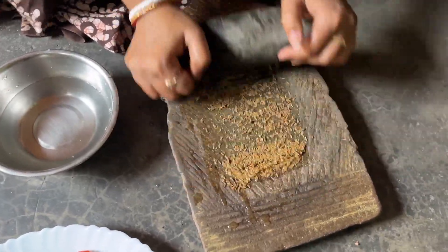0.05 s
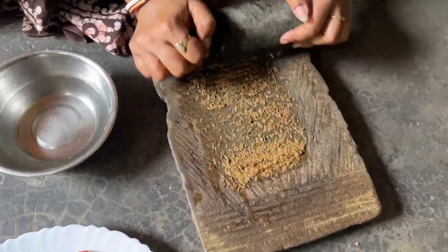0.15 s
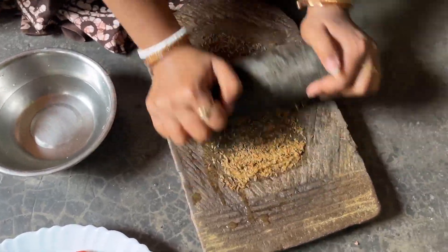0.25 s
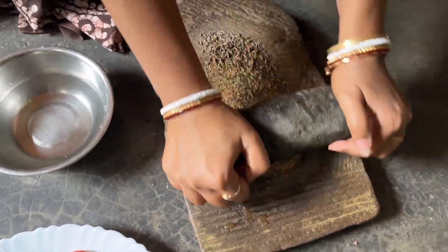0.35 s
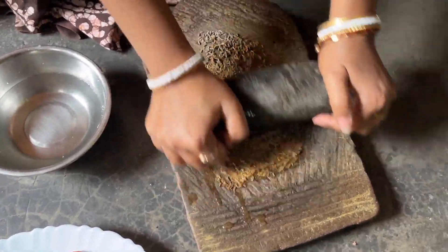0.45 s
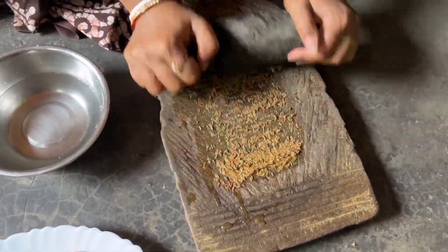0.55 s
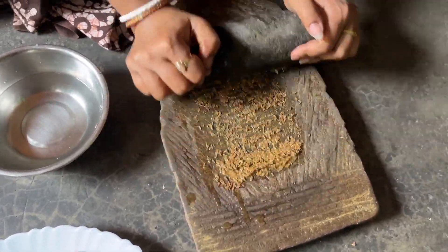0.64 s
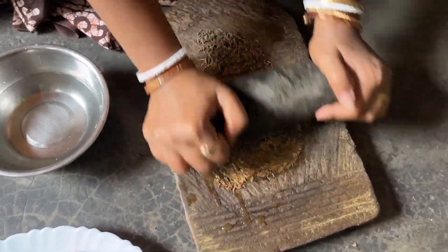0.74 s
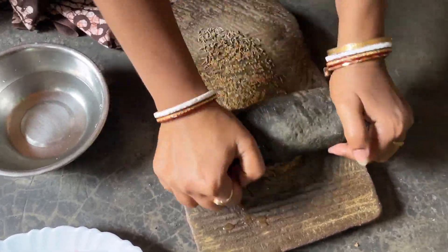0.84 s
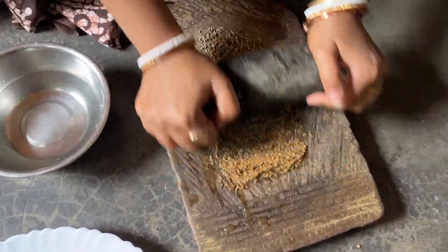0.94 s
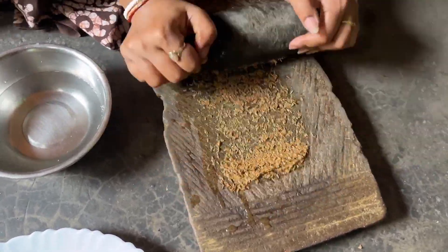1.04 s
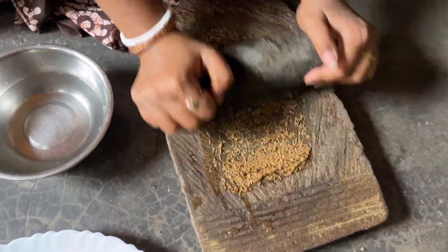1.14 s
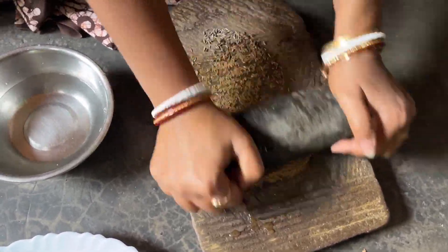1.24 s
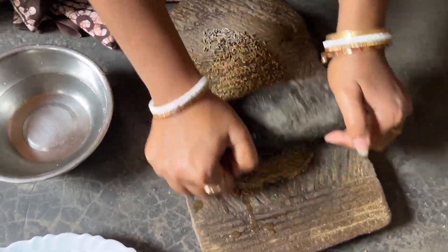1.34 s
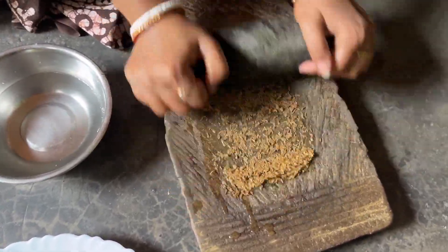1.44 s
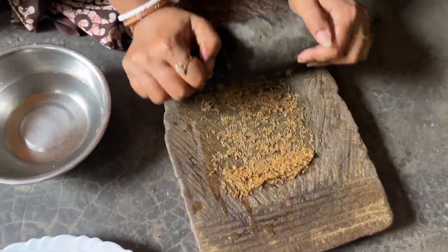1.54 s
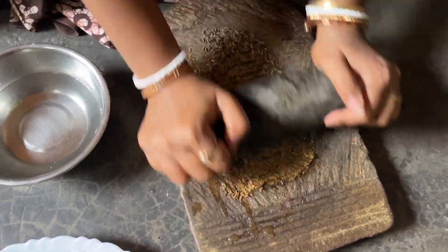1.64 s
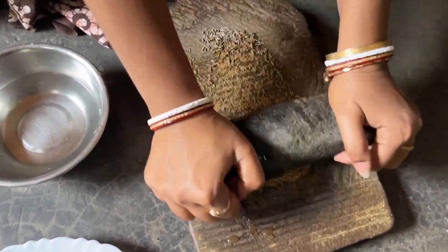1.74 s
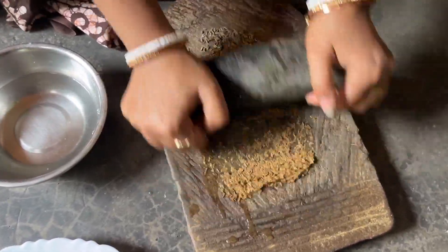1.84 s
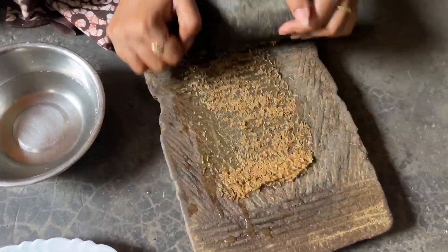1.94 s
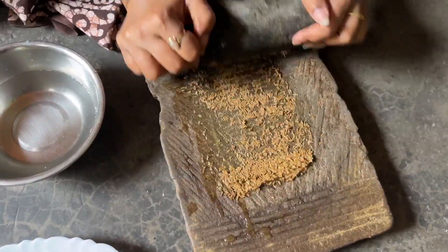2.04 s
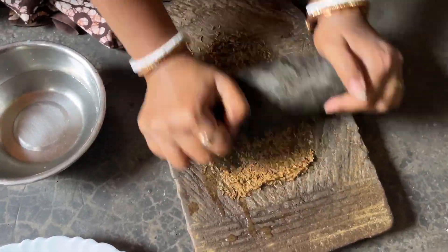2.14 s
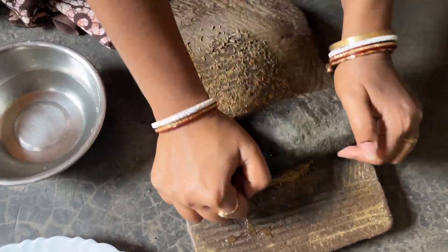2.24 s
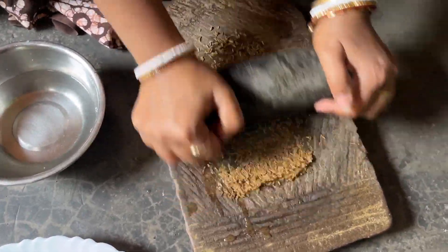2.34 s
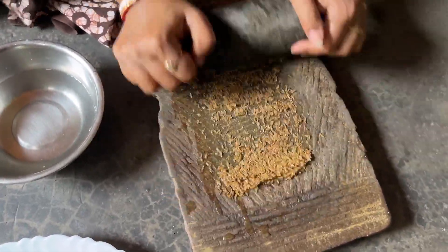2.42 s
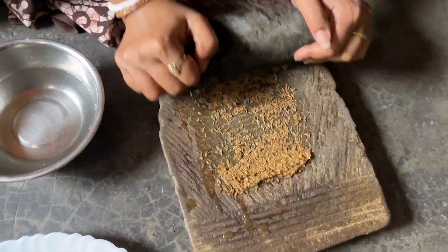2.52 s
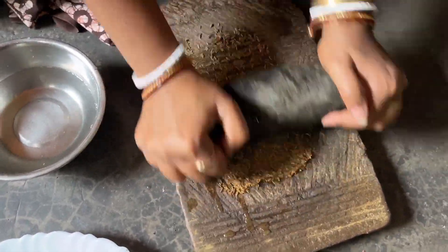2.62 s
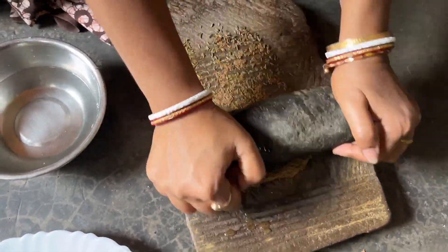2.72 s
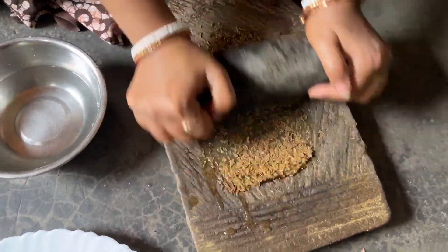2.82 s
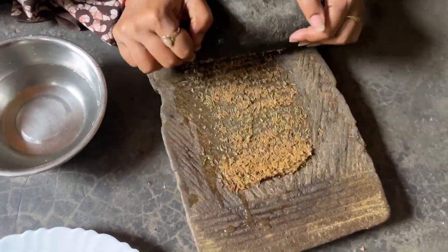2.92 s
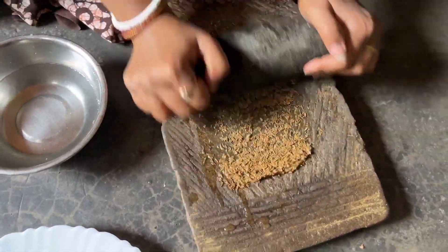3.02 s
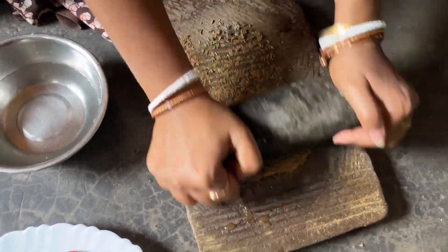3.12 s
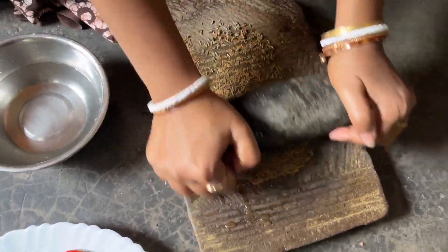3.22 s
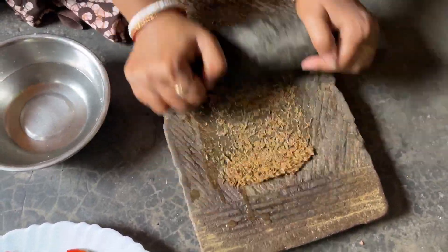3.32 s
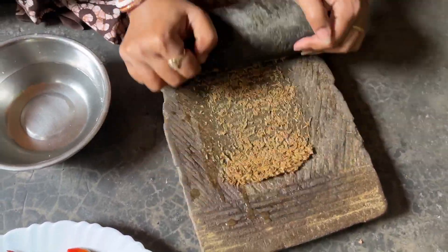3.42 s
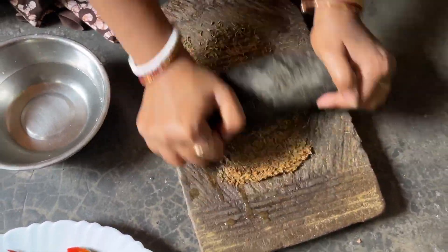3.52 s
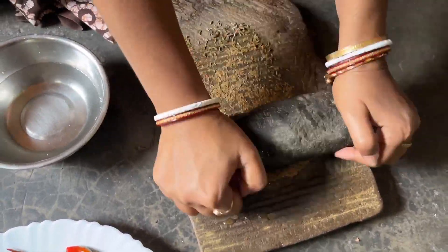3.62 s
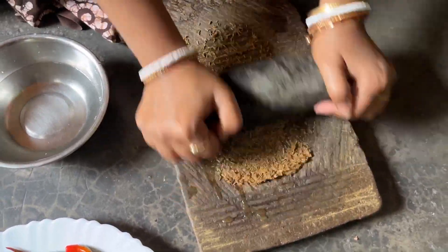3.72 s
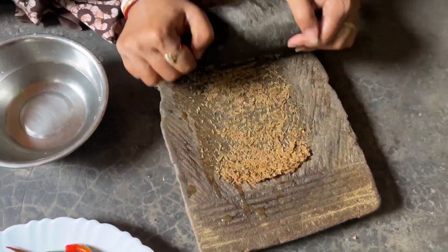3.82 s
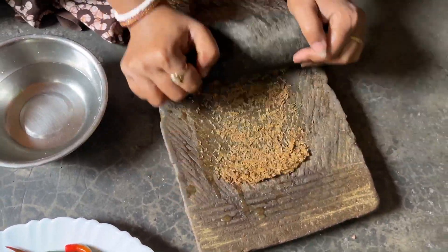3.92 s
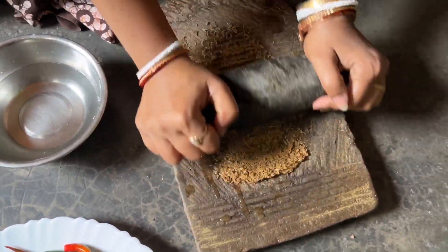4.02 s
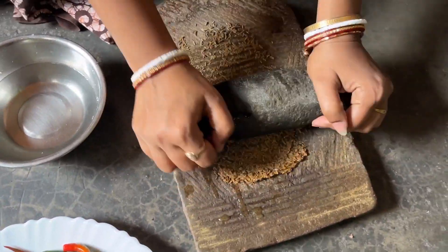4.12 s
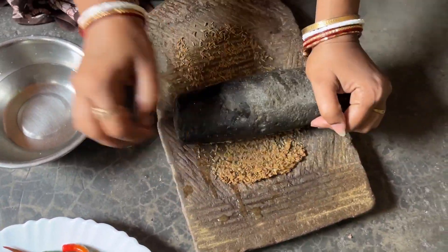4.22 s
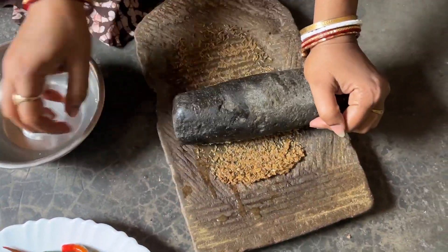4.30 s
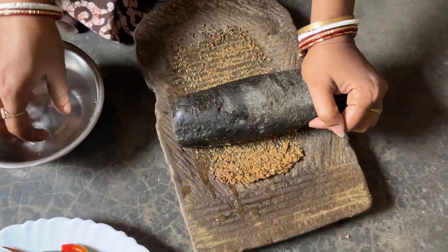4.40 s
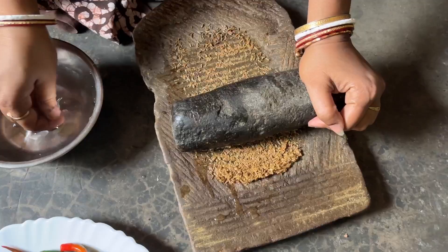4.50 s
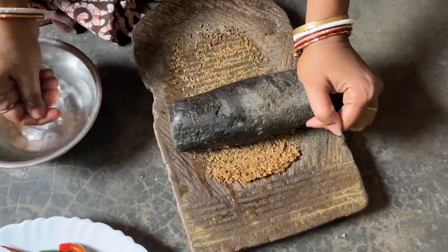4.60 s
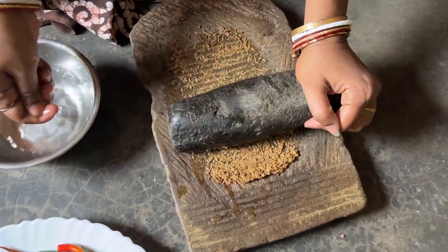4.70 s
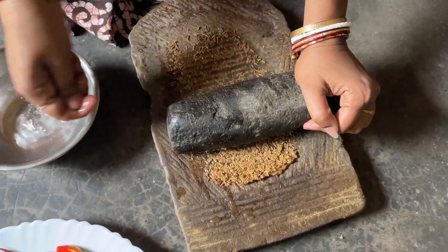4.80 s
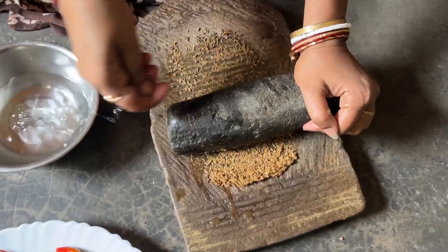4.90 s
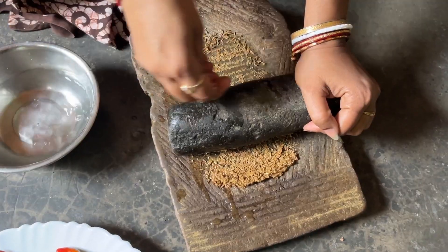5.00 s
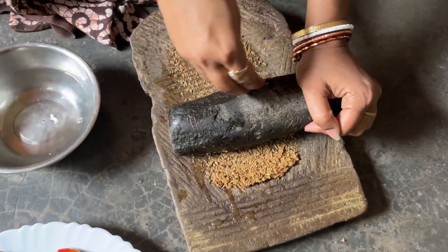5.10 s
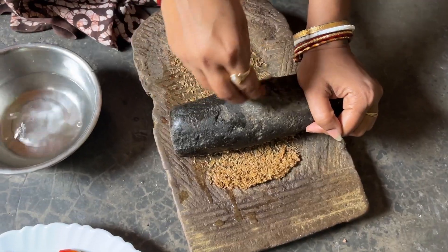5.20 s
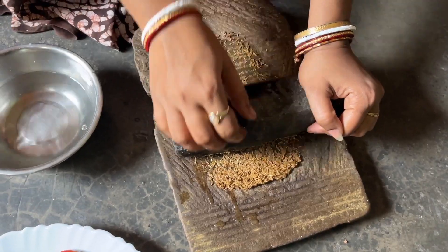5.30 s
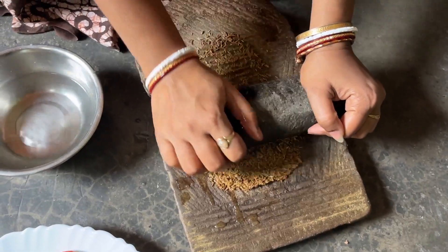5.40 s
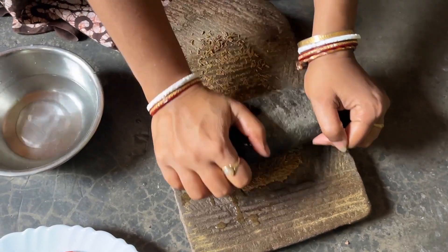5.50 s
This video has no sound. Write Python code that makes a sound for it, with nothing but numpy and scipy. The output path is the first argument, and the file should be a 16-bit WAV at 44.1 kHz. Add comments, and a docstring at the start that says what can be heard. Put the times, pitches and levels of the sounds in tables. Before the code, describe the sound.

A close stereo microphone in a small, fairly dry kitchen hears a stone roller worked over spices on a grooved stone slab. From 0 to about 4.1 s it moves to and fro, each stroke lasting roughly a quarter second, with a deep soft rumble, coarse grinding and crackling grain crunch that swell mid-stroke and dip at the turns. Short, dull, hollow stone knocks around 900 Hz come in irregular clusters, dense at the very start, around 0.5-0.6, 2.3-2.5 and 3.7-3.9 s; brief rough singing rubs appear near 1.5, 2, 2.9 and 3.4 s. Thin, very bright bangle clinks, only milliseconds long, gather mostly at stroke ends, such as 0.3, 0.8, 1.25, 1.7, 2.2, 2.7, 3.15, 3.6 and 4.05 s. A pan sizzles softly and evenly behind everything over a faint low hum. After a last tiny clink near 4.14 s only the sizzle remains, until a barely audible roll and tap from about 5.45 s.

```python
"""A stone roller is pushed to and fro over wet spices on a grooved stone slab in a home kitchen.
It rumbles (shaped noise), crunches grains (random clicks ringing the stone) and knocks over the grooves
(short bursts of the stone's tones); now and then it sings roughly. Bangles clink as bright ringing tones.
A pan sizzles further off: thousands of clicks a second, merged to a hiss. Two close microphone ports hear it."""
import sys
import numpy as np
from scipy import signal
from scipy.fft import rfft, irfft
from scipy.io import wavfile

SR = 44100
rng = np.random.default_rng(int(sys.argv[2]) if len(sys.argv) > 2 else 0)


def master(y):
    """Save y as 16-bit WAV."""
    cut = np.clip(np.atleast_2d(y).T, -1, 1)
    pcm = np.round(cut * 32767)  # scale
    wavfile.write(sys.argv[1], SR, pcm.astype(np.int16))


N = 244755  # length in samples

# Passes of the roller, push and pull in turn, each ending where the next starts; levels when fastest:
# start t/s, slab rumble level/dB, roller grind level/dB, grain crunch level/dB
PASSES = [(-.1, -42, -34, -34), (0.142, -35.5, -48, -37.5), (.37, -34, -41.5, -33.5),
          (0.653, -35, -43, -33), (.83, -36.5, -43, -35), (1.08, -36.5, -41, -37),
          (1.29, -33.5, -39.5, -33.5), (1.56, -33.5, -41, -34), (1.74, -34.5, -39.5, -31),
          (1.98, -36, -52, -35.5), (2.24, -33.5, -38, -37), (2.53, -36, -39, -39), (2.72, -33, -43, -36),
          (2.98, -36, -40.5, -34.5), (3.19, -33.5, -42, -36), (3.44, -36, -41, -34.5),
          (3.64, -34.5, -42.5, -37.5), (3.91, -35.5, -41, -38), (4.035, -90, -90, -90),
          (5.44, -50, -63, -54)]
# Ringing tones (modes) of the stone; their times are scaled by each kind of contact:
# f/Hz, rise t/s, decay t/s, left over right level/dB, level in the crunch/dB
STONE = [(207, 0.004, 0.0019, -1, -6), (478, 0.0028, 0.0045, 4, 0), (920, .0036, .0028, 6.5, 0),
         (1410, 0.0062, 0.0046, -1.5, 0), (1760, 0.003, 0.0022, 6, -3), (2323, 0.0028, 0.0016, 1, -11),
         (3340, 0.003, 0.003, 0, -40)]


def from_db(db):
    """Turns a level in dB into a gain."""
    return 10 ** (np.asarray(db) / 20)


def rms_one(x):
    """Scales a sound to an rms strength of 1."""
    return x / np.sqrt(np.mean(x ** 2) + 1e-20)


def in_time(rows):
    """Reads the columns of a time table at every sample."""
    s, *columns = np.transpose(rows)
    return [np.interp(np.arange(N) / SR, s, column) for column in columns]


def at_hz(points, hz):
    """Reads a spectrum table along a logarithmic pitch axis."""
    table_hz, values = np.array(points)[:, 0], np.array(points)[:, 1]
    return np.interp(np.log(hz + 1), np.log(table_hz), values)


def drift(rate_hz):
    """Smoothed noise that wanders slowly about zero with an rms of 1."""
    step = 40  # one value per 40 samples, joined by straight lines
    r = np.exp(-2 * np.pi * rate_hz * step / SR)
    noise = rng.standard_normal(N // step + 2002)
    slow = signal.lfilter([1], [1, -2 * r, r * r], noise)[2000:]
    return np.interp(np.arange(N) / step, np.arange(len(slow)), rms_one(slow))


def sparse(per_s, spread_db):
    """Clicks at random moments, of uneven size and either sign."""
    sizes = from_db(spread_db * np.minimum(rng.exponential(1, N), 4))
    sizes = sizes * rng.choice([-1, 1], N)
    return sizes * (rng.random(N) < per_s / SR)


def side_gains(left_over_right_db):
    """Gains of left and right for a level difference between them."""
    return from_db([[left_over_right_db / 2], [-left_over_right_db / 2]])


def ports(shared, left_own, right_own):
    """Spectra at two ports that share part of a sound; in the treble the right port gets that part early."""
    # Likeness of the ports: f/Hz, left-right correlation (1 alike, 0 unrelated, -1 opposite)
    likeness_table = [(60, 1), (200, 0.87), (500, 0.72), (800, 0.17), (1200, -0.26), (2700, 0.28),
                      (5700, 0.23), (7200, 0.81), (8300, 1), (9800, 1), (11500, 0.95), (12600, .99),
                      (14000, 1), (15500, 1)]
    lead_s, lead_from_hz = .000135, 4600
    hz = np.fft.rfftfreq(N, 1 / SR)
    alike = np.clip(at_hz(likeness_table, hz), -1, 1)
    early = np.exp(2j * np.pi * lead_s * np.maximum(hz - lead_from_hz, 0))
    common = np.sqrt(abs(alike)) * rfft(shared)
    own = np.sqrt(1 - abs(alike))
    left = common + own * rfft(left_own)
    right = np.sign(alike) * early * common + own * rfft(right_own)
    return np.array([left, right]), hz


def passes():
    """Levels of rumble, grind and crunch follow the roller's speed and die away when it rests."""
    # The roller tips over with a short scrape at the end of a pull: t/s, grind level/dB, crunch level/dB
    tip_table = [(0.321, -40, -30), (.8, -53, -38), (1.255, -45, -38), (1.7, -54, -35), (2.171, -39, -33),
                 (2.688, -47, -37), (3.149, -41, -32.5), (3.593, -40, -36), (4.076, -49, -36.5)]
    last_stop_s = 5.7  # end of the last, light pass
    # Share of the pass at which rumble, grind and crunch are strongest, then their loss at the turns
    fastest_push, fastest_pull = [0.7, 0.39, 0.54], [0.47, 0.31, 0.22]
    slow_db = [-7, -33, -9.5]
    run_out_db_per_s, tip_s = 400, 0.014  # fastest fall of a level; half length of a tip

    t, rows = np.arange(N) / SR, np.array(PASSES)
    starts = np.append(rows[:, 0], last_stop_s)
    k = np.searchsorted(starts, t, "right") - 1
    along = (t - starts[k]) / np.diff(starts)[k]
    fastest = np.where(k % 2, np.c_[fastest_pull], np.c_[fastest_push])
    fastest = np.clip(fastest, .1, .9)
    # half a sine wave, bent so that its top lies at the fastest point
    force = np.sin(np.pi * along ** (np.log(.5) / np.log(fastest)))
    levels = rows[k, 1:].T + np.c_[slow_db] * (1 - force)
    run_out = run_out_db_per_s * t
    levels = np.maximum.accumulate(levels + run_out, axis=1) - run_out
    power = from_db(levels) ** 2
    for s, *tip_db in tip_table:
        power[1:] += np.outer(from_db(tip_db) ** 2, np.exp(-((t - s) / tip_s) ** 2))
    return 10 * np.log10(power)


def rumble(slab_db, grind_db):
    """The slab shakes on the floor under the rolling load; above it the roller grinds in lumps."""
    # Shape of the shaking spectrum, before the overall level: f/Hz, level per Hz/dB
    rumble_table = [(25, -40), (45, -10.5), (80, 2), (110, -2.5), (150, 0.5), (185, -4), (225, 2.5),
                    (310, -1.5), (420, -9.5), (600, -77)]
    grind_from_hz = 231
    hz = np.fft.rfftfreq(N, 1 / SR)
    shake = rfft(rng.standard_normal((2, N))) * from_db(at_hz(rumble_table, hz))
    # the close ports differ only by the slope of the wave
    slope = 1j * (hz / 640.0) ** 1.56 * shake[1]
    both = shake[0] + slope * [[1], [-1]]
    upper = 1 / (1 + (grind_from_hz / (hz + 1)) ** 6)
    slab = rms_one(irfft(both * (1 - upper), N)) * from_db(slab_db + 1.0 * drift(21.0))
    grind = rms_one(irfft(both * upper, N)) * from_db(grind_db + 4.8 * drift(53))
    return slab + grind


def burst(hz, rise, decay):
    """A soft stone contact: one tone swells smoothly, then dies; its envelope peaks at 1."""
    t = np.arange(900) / SR
    fade_out = np.cos(np.pi / 2 * t / t[-1])
    shape = (1 - np.exp(-(t / rise) ** 2)) * np.exp(-t / decay) * fade_out
    return -np.sin(2 * np.pi * hz * t) * shape / shape.max()


def crunch(level_db):
    """Grains crack under the roller in clumps and ring the stone's modes, all but the lowest."""
    out = 0
    cracks_per_s = 1200.0 * from_db(3.0 * drift(25))
    for hz, rise, decay, side_db, mode_db in STONE[1:]:
        cracks = sparse(cracks_per_s, spread_db=3.0)
        ring = signal.fftconvolve(cracks, burst(hz, 0.36 * rise, 0.27 * decay))[:N]
        out = out + from_db(mode_db) * side_gains(side_db) * rms_one(ring)
    return from_db(level_db) * rms_one(out)


def knocks(light_knocks):
    """Each ridge excites all modes; where the roller lands decides their balance and the low pitch."""
    # The roller knocks on a ridge:
    # t/s, low ring level/dB, low ring f/Hz, middle ring level/dB, high ring level/dB
    ridge_knocks = [(0, -18.5, 845, -16, -38), (.0035, -29, 910, -20, -24), (.0085, -38, 920, -15, -34),
                    (.021, -40, 920, -17, -26), (.028, -20, 920, -10.5, -15.5), (.0325, -30, 900, -23, -26),
                    (.0358, -13, 910, -6.5, -15), (.0465, -39, 875, -19, -43),
                    (.0847, -13, 900, -20.5, -29), (.202, -26, 860, -44, -45), (.242, -34, 900, -28, -33),
                    (.2568, -24, 910, -37, -25.5), (.3095, -26, 1016, -20, -19.5),
                    (.3172, -34, 925, -24, -23), (.324, -42, 1020, -30, -31),
                    (.399, -11.5, 930, -20.5, -16), (.416, -18.5, 780, -22, -23),
                    (.4648, -11.5, 940, -23, -15), (.4845, -28, 844, -24, -25), (.505, -13, 910, -22, -17),
                    (.5588, -7.5, 910, -16, -17), (.572, -13, 870, -16, -18), (.589, -7, 930, -35, -17),
                    (.6023, -8, 980, -14, -19), (.6215, -6, 955, -23, -19), (.6777, -25, 920, -29, -28),
                    (.7039, -25, 940, -29, -25), (.8557, -17.5, 820, -29, -23.5),
                    (.9159, -13, 910, -23.5, -20), (.952, -16.5, 910, -30, -21),
                    (1.0101, -20, 900, -47, -31), (1.025, -28, 860, -45, -45),
                    (1.1325, -23.5, 985, -27, -26), (1.151, -35, 860, -32, -25.5),
                    (1.163, -18.5, 910, -35, -23.5), (1.173, -28, 800, -39, -26),
                    (1.2495, -24.5, 760, -35, -37), (1.2585, -25, 680, -34, -51),
                    (1.3083, -18, 846, -29, -25), (1.3685, -11.5, 910, -25, -19),
                    (1.4066, -16.5, 910, -27, -26), (1.4635, -13, 934, -32, -34),
                    (1.4845, -11.5, 925, -27, -46), (1.503, -16, 1010, -37, -45),
                    (1.518, -21, 990, -36, -50), (1.582, -34, 930, -36, -48), (1.6036, -22, 860, -33, -25),
                    (1.6159, -18, 950, -39, -30), (1.626, -28, 880, -37, -27), (1.664, -30, 940, -30, -24),
                    (1.6905, -15.5, 790, -26, -23), (1.7028, -16.5, 680, -21.5, -47),
                    (1.8017, -18, 850, -36, -28), (1.8375, -29, 840, -42, -47),
                    (1.849, -18, 990, -10.5, -17), (1.8535, -28, 940, -15, -31),
                    (1.895, -13, 910, -5.5, -15.5), (1.9314, -16, 810, -23, -39),
                    (1.9381, -9.5, 974, -16.5, -19.5), (1.998, -21.5, 940, -44, -47),
                    (2.008, -25, 970, -44, -53), (2.0197, -21, 1030, -40, -51),
                    (2.0343, -27, 960, -47, -53), (2.045, -26, 950, -45, -52), (2.0622, -21, 900, -27, -51),
                    (2.086, -39, 1020, -26, -42), (2.1141, -18.5, 840, -33, -24),
                    (2.129, -28, 830, -38, -28), (2.167, -37, 910, -26, -26),
                    (2.2135, -23, 754, -21.5, -26), (2.2701, -15, 925, -28, -17),
                    (2.285, -16.5, 814, -24, -20), (2.3312, -8, 950, -23, -16.5),
                    (2.3523, -24, 840, -28, -19), (2.368, -15, 920, -23, -18.5),
                    (2.4244, -7.5, 930, -18, -15.5), (2.4382, -9.5, 910, -13.5, -19),
                    (2.452, -7, 940, -21, -17), (2.4667, -7.5, 950, -14.5, -32),
                    (2.4779, -6.5, 956, -29, -27), (2.4836, -20, 965, -17.5, -18),
                    (2.5006, -10.5, 980, -31, -26), (2.5195, -26, 940, -29, -32),
                    (2.5544, -22, 955, -30, -33), (2.572, -29, 780, -39, -24), (2.5807, -19, 910, -30, -36),
                    (2.591, -35, 805, -34, -29), (2.679, -26, 800, -31, -35), (2.688, -30, 750, -28, -36),
                    (2.7376, -23.5, 845, -40, -30), (2.7971, -13.5, 910, -25, -21),
                    (2.8139, -35, 860, -27, -26), (2.8308, -13, 910, -26, -16.5),
                    (2.8895, -13, 930, -41, -30), (2.8958, -17, 955, -24, -29),
                    (2.9103, -10.5, 945, -29, -29), (2.9266, -14, 960, -44, -38),
                    (2.943, -19, 960, -32, -50), (3.0206, -28, 980, -45, -42), (3.0414, -30, 950, -39, -36),
                    (3.062, -33, 995, -39, -31), (3.137, -18.5, 810, -25, -30),
                    (3.1505, -21, 680, -25.5, -43), (3.2705, -15.5, 910, -30, -26),
                    (3.3022, -19.5, 885, -32, -27), (3.3562, -11.5, 910, -25, -45),
                    (3.3654, -19.5, 875, -20, -26), (3.3783, -11.5, 940, -37, -26),
                    (3.3949, -16, 980, -27, -43), (3.4715, -19, 950, -28, -25),
                    (3.4894, -21.5, 830, -25, -40), (3.5011, -22, 950, -45, -32),
                    (3.5871, -20.5, 760, -27, -43), (3.5983, -30, 770, -26, -32),
                    (3.6794, -18.5, 875, -30, -23.5), (3.7361, -10, 940, -23, -16),
                    (3.7544, -16, 816, -29, -31), (3.771, -13, 930, -20, -18),
                    (3.8253, -7, 940, -28, -17.5), (3.8365, -13, 970, -16, -23),
                    (3.8483, -9, 990, -38, -24.5), (3.858, -12, 930, -20, -30),
                    (3.8713, -14, 960, -26, -22), (3.936, -33, 940, -46, -45),
                    (4.0655, -24, 914, -22.5, -23), (5.456, -39, 790, -42, -40)]
    # extra modes, relative to the low, high, high and middle ring in turn
    thud_db, body_db, bite_db, edge_db = -17, -4.5, -10, -14
    bite_spread_db = 4
    middle_follows = .3  # the middle ring's pitch follows the low ring's by this power
    rows = [*ridge_knocks, *light_knocks]
    out = np.zeros((2, N + 900))
    chance = rng.normal(0, 1, (len(rows), 11))
    for (s, low_db, low_hz, middle_db, high_db), luck in zip(rows, chance):
        levels = [low_db + thud_db + 4.5 * luck[0],
                  high_db + body_db + 2 * luck[1],
                  low_db, middle_db, high_db,
                  high_db + bite_db + bite_spread_db * luck[2],
                  middle_db + edge_db + 0.69 * luck[3]]
        # a lighter blow keeps contact longer; at -41 dB the times are those of the table
        soft = from_db(-.15 * (max(low_db, middle_db) + 41.0))
        detune = 1 + luck[4:] / 60  # the grip of the hands shifts each mode a little
        detune[3] *= (low_hz / STONE[2][0]) ** middle_follows
        i = round(s * SR)
        for k, (hz, rise, decay, side_db, _) in enumerate(STONE):
            ring_hz = low_hz if k == 2 else hz * detune[k]
            ring = burst(ring_hz, rise * soft, decay * soft)
            out[:, i:i + 900] += from_db(levels[k]) * side_gains(side_db) * ring
    return out[:, :N]


def taps(crunch_db, count=45):
    """Light knocks at random moments of the grinding; their strength follows the crunch around them."""
    over_crunch_db, spread_db = 11.5, 4
    middle_over_low_db, high_over_low_db, low_hz = -30, -7, 910
    s = rng.uniform(0, PASSES[-2][0], count)
    luck = rng.normal(0, 1, (count, 4)).T
    low_db = crunch_db[(s * SR).astype(int)] + over_crunch_db + spread_db * luck[0]
    middle_db = low_db + middle_over_low_db + 5 * luck[2]
    high_db = low_db + high_over_low_db + 5 * luck[3]
    return list(zip(s, low_db, low_hz * (1 + 0.19 * luck[1]), middle_db, high_db))


def rubs():
    """Stick-slip keeps a mode ringing with wavering strength and phase; its pitch sags as the roller slows."""
    # The roller slides on bare stone and one mode sings roughly:
    # start t/s, length t/s, starting f/Hz, level/dB
    rub_table = [(1.461, 0.087, 970, -30), (1.908, 0.03, 1430, -31), (1.994, 0.14, 1020, -36),
                 (2.893, 0.084, 970, -35), (3.357, 0.069, 960, -34)]
    sag_per_s, rough_hz = 0.4, 120  # share of pitch lost per second; rate of the wavering
    out = np.zeros((2, N))
    waver = drift(rough_hz) + 1j * drift(rough_hz)
    for s, length, hz, db in rub_table:
        t, i = np.arange(int(length * SR)) / SR, round(s * SR)
        cycles = hz * t * (1 - sag_per_s * t / 2)
        tone = np.exp(2j * np.pi * cycles) * waver[i:i + len(t)]
        swell = np.sqrt(np.sin(np.pi * t / length))
        side_db = at_hz([(mode[0], mode[3]) for mode in STONE], hz)
        out[:, i:i + len(t)] += from_db(db) * side_gains(side_db) * tone.real * swell
    return out


def bangles():
    """Each touch is a dry snap into the short bright modes of the rings, strongest near its own centre."""
    # Bangles touching: t/s, strength before the mode levels and chance/dB, centre f/Hz
    clink_table = [(0.2241, -38, 13400), (0.227, -28, 13400), (0.3163, -21, 13600), (0.3185, -19, 13500),
                   (0.3225, -22, 13300), (0.3271, -29.5, 12400), (0.6577, -32, 12300), (0.6648, -32, 12100),
                   (0.6933, -29, 11700), (0.744, -27, 11700), (0.7873, -27, 12400), (0.7935, -26, 11500),
                   (0.7974, -22, 12500), (0.8015, -27, 11200), (1.1217, -27, 11200), (1.2129, -33.6, 12100),
                   (1.2242, -29, 12200), (1.2404, -30.9, 13500), (1.244, -27, 11900), (1.2491, -34, 12300),
                   (1.2585, -30.4, 12300), (1.262, -33, 11600), (1.687, -26, 12500), (1.6939, -29.6, 13100),
                   (1.7058, -24.5, 12500), (1.7086, -29, 12900), (2.138, -30, 12200), (2.147, -31, 12000),
                   (2.1698, -29, 12800), (2.1745, -28, 13000), (2.18, -25, 13300), (2.1901, -31.1, 12700),
                   (2.1947, -26, 12100), (2.645, -24, 12900), (2.6584, -26.9, 12800), (2.6693, -27, 12900),
                   (2.6814, -32, 11800), (3.1208, -28, 12800), (3.1234, -30.5, 13600), (3.1374, -26, 13500),
                   (3.1406, -35, 13400), (3.147, -38, 12700), (3.149, -21.5, 12800), (3.6, -30, 12100),
                   (3.6026, -25, 12500), (3.606, -25, 12300), (3.6105, -32, 12600), (3.821, -35, 11700),
                   (3.9157, -33.7, 13200), (4.0237, -26, 13500), (4.0297, -29.9, 13600),
                   (4.0324, -35, 12800), (4.0386, -26, 13600), (4.0594, -31.3, 13600), (4.0618, -33, 12500),
                   (4.1388, -36, 11600)]
    # Modes of the bangles: f/Hz, level/dB, time to fall by 60 dB t/s
    bangle_modes = [(7200, -8.5, 0.005), (8150, -37, 0.002), (9100, 8, 0.0045), (10060, 8, 0.0019),
                    (11130, 1, 0.0051), (11800, -8, 0.0032), (12500, -2.5, 0.0043), (13500, 2, 0.007),
                    (13800, -13, .004), (14450, 7, 0.0057), (14600, -20, 0.003), (16600, -26, 0.003)]
    width_hz = 2900  # a touch favours the modes this near its centre
    after_s, after_db = .004, -3  # two touches, lighter on average, follow within this time
    s, touch_db, centre_hz = np.transpose(clink_table)
    after = s + after_s * rng.uniform(0.12, 1, (len(s), 2)).T
    s = np.append(s, after)
    touch_db = np.append(touch_db, np.tile(touch_db + after_db, 2))
    centre_hz = np.tile(centre_hz, reps=3)
    sides = np.zeros((3, N))  # shared part, left's own, right's own
    for hz, mode_db, t60 in bangle_modes:
        r, w = from_db(-60 / (t60 * SR)), 2 * np.pi * hz / SR
        hits, luck = np.zeros((3, N)), rng.normal(0, 1, (len(s), 3)).T
        near_db = -6.0 * ((hz - centre_hz) / width_hz) ** 2
        hit_db = touch_db + mode_db + near_db - 4 + 3 * luck
        hits[:, (s * SR).astype(int)] = np.sign(luck) * from_db(hit_db)
        # a resonator turns each click into a dying tone
        sides += signal.lfilter([0, np.sin(w)], [1, -2 * r * np.cos(w), r * r], hits + 1e-18)
    return irfft(ports(*sides)[0], N)


def kitchen(x):
    """Short diffuse tail of floor and walls; long waves reach both ports alike."""
    t60_s, tail_db = 0.1, -10
    t = np.arange(int(.2 * SR)) / SR
    fade = from_db(-60 * t / t60_s) * (t > .003)
    mid, side = rng.standard_normal((2, len(t))) * fade
    side = signal.sosfilt(signal.butter(2, 600.0, "high", fs=SR, output="sos"), side)
    tail = (mid + side * [[1], [-1]]) / np.sqrt(2 * np.sum(mid ** 2))
    return from_db(tail_db) * signal.fftconvolve(x, tail, axes=1)[:, :N]


def sizzle():
    """Thousands of tiny fat bursts a second merge to a hiss; its bands waver on their own, fine grit joins the top."""
    # Shape of sizzle and kitchen hum, before the overall level: f/Hz, level per Hz/dB
    sizzle_shape = [(30, -20), (60, -6), (125, -6.5), (164, -1), (200, -17.5), (500, -19), (900, -12),
                    (1500, -6.5), (2400, -8.5), (4500, -2.5), (6600, -10), (9000, -11), (13000, -14),
                    (15650, -24.5), (15950, -55)]
    # Resonances of pan and kitchen in the hiss: f/Hz, width f/Hz, left level/dB, right level/dB
    pan_table = [(620, 45, 10.5, 11.5), (1610, 52, -10, 10), (1760, 46, 14, -4), (2320, 350, 6.5, 6.5),
                 (2770, 500, 5, 6), (3780, 990, 4.5, 1), (4600, 240, 2, -1), (5230, 280, 4.5, 1),
                 (6730, 1070, 3.5, 4.5)]
    # Sizzle below the treble, raised by 3 dB further down: t/s, level/dB
    body_levels = [(0, -36), (5.55, -36)]
    # Fine grit hiss and top of the sizzle, raised by 9 dB further down: t/s, level/dB
    treble_levels = [(0.0, -54.5), (0.6, -53), (1.67, -52.5), (2.1, -52.5), (2.22, -54.5), (2.33, -52.5),
                     (2.94, -51.5), (4.82, -55), (5.07, -53), (5.55, -54)]
    pair, hz = ports(*[rms_one(sparse(9000.0, spread_db=1.5)) for _ in range(3)])
    peaks_db = 0
    for top_hz, width, *sides_db in pan_table:
        peaks_db = peaks_db + np.outer(sides_db, 1 / (1 + (2 * (hz - top_hz) / width) ** 2))
    pair = pair * from_db(at_hz(sizzle_shape, hz) + peaks_db)
    top = np.clip((hz - 7000) / 2000, 0, 1)
    edges = [0, *np.geomspace(1000, 7000, num=12), SR]
    body = 0
    for low, high in zip(edges, edges[1:]):
        band = irfft(pair * (1 - top) * (hz >= low) * (hz < high), N)
        body = body + band * from_db(1.09 * drift(5.3) + 1.0 * drift(26))
    treble_db = in_time(treble_levels)[0] + 9.0 + 1.0 * drift(20)
    treble = rms_one(irfft(pair * top, N)) * from_db(treble_db)
    return rms_one(body) * from_db(in_time(body_levels)[0] + 3.0) + treble


def scene():
    """Stones, bangles, their room, and the pan."""
    stone_lag_s = .00011  # the stone reaches the right port this much later
    slab_db, grind_db, crunch_db = passes()
    stone = knocks(taps(crunch_db)) + crunch(crunch_db) + rubs()
    # stone on wet paste radiates little treble
    stone = signal.sosfilt(signal.butter(2, 5000, fs=SR, output="sos"), stone)
    rings = bangles()
    lag = round(stone_lag_s * SR)
    stone = np.array([stone[0], np.pad(stone[1], (lag, 0))[:N]])
    room = kitchen(stone + .5 * rings)  # the walls return little treble
    return stone + rings + room + rumble(slab_db, grind_db) + sizzle()


def record(dry):
    """The microphone loses the deepest bass; the top is cut."""
    cutoff_hz = 16700
    thin = signal.sosfilt(signal.butter(2, 45.0, "high", fs=SR, output="sos"), dry)
    return signal.sosfilt(signal.cheby2(16, 60, cutoff_hz, fs=SR, output="sos"), thin)


dry = scene()
out = record(dry)
master(out)
```